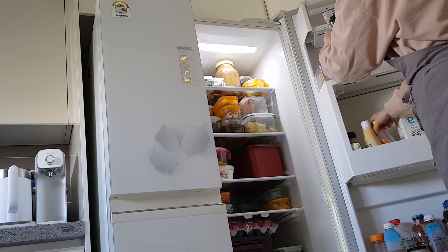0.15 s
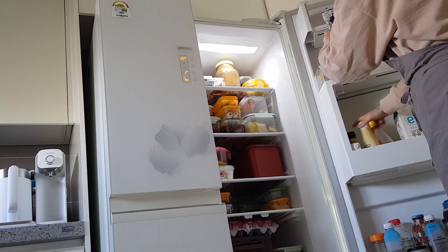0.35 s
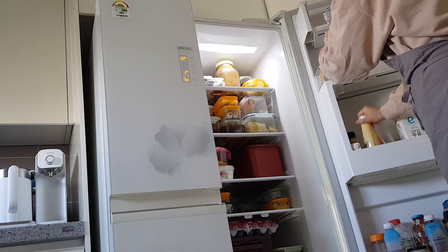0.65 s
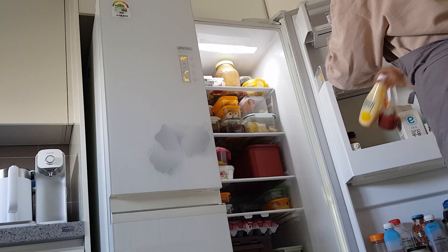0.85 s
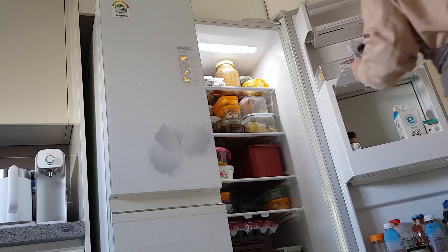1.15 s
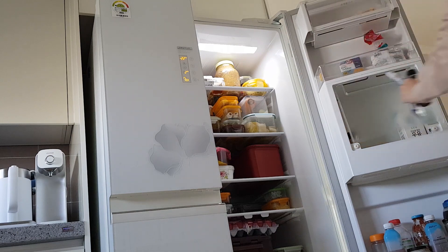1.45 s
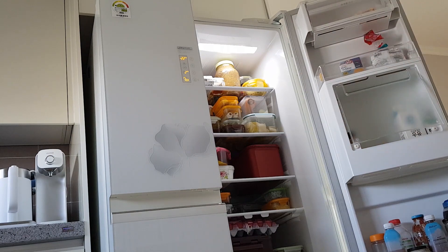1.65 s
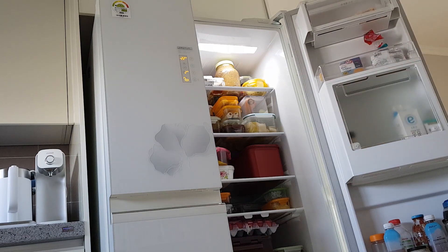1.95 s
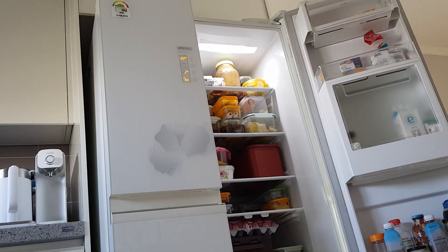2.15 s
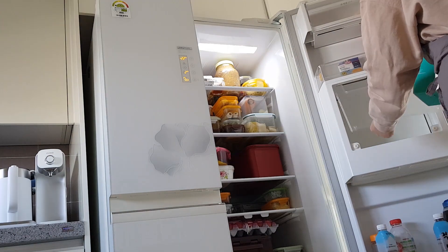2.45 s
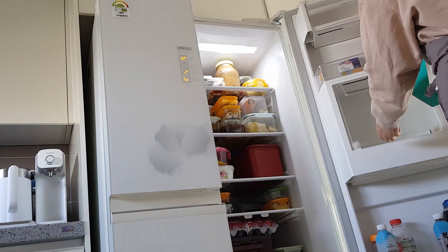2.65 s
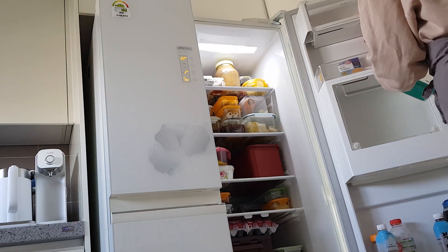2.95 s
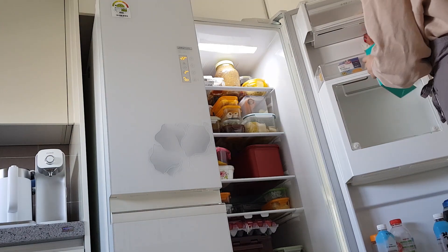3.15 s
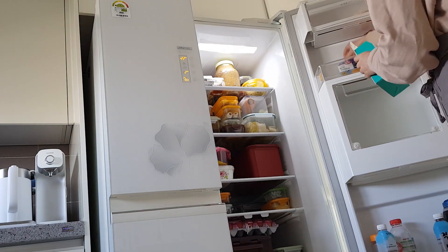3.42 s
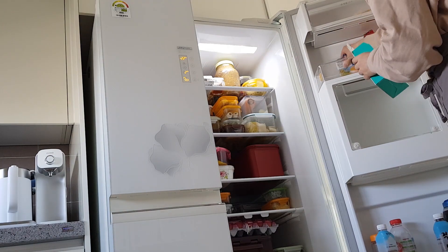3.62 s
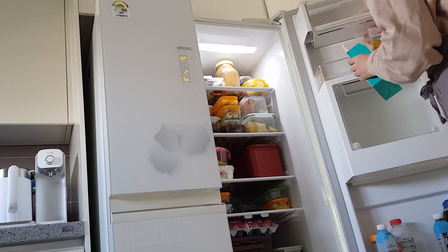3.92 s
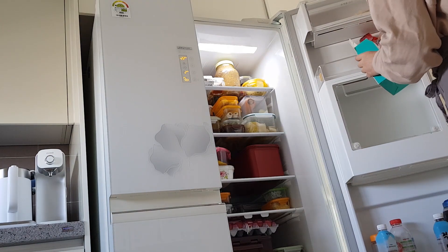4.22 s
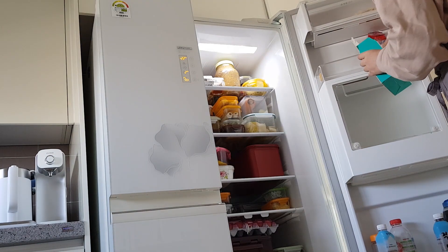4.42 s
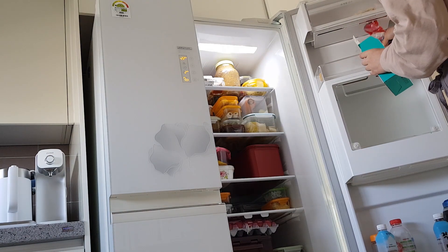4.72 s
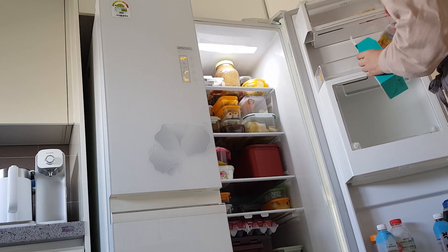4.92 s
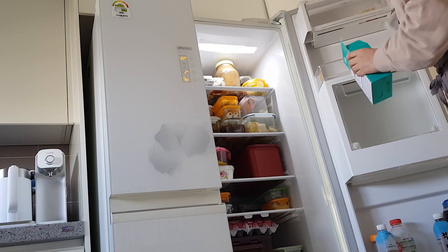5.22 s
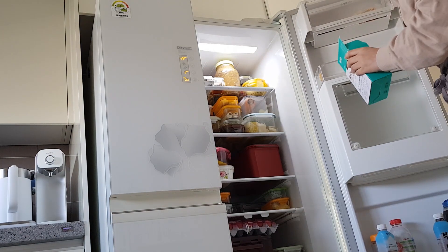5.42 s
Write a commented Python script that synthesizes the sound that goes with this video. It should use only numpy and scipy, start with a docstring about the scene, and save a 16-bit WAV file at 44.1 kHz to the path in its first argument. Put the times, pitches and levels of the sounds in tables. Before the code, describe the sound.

Bottles and jars knock and clink from a fridge door, an armful thuds onto a counter, a cover bangs shut, then plastic packets crackle.

```python
"""Bottles and jars knock and clink as the door shelves of a refrigerator are emptied in a hard-walled kitchen.
An armful lands on a counter, the bin's cover is pushed shut, then plastic packets are dragged off the top shelf.
Impacts are filtered clicks and decaying modes; film, scraping and cloth are trains of tiny random snaps.
Most sounds pass through a synthetic room; air noise and the compressor's hum lie underneath."""
import sys
import numpy as np
from scipy import signal
from scipy.fft import rfft, irfft
from scipy.io import wavfile

SR = 44100
rng = np.random.default_rng(int(sys.argv[2]) if len(sys.argv) > 2 else 0)


def log_audio(samples):
    """Write samples as a 16-bit WAV file to the path given in sys.argv[1]."""
    # one column per channel
    frames = np.atleast_2d(samples).T
    # limit to full scale, then quantise
    limited = np.clip(frames, -1, 1)
    pcm = np.round(limited * 32767).astype(np.int16)
    wavfile.write(sys.argv[1], SR, pcm)


N = 246078

HZ = np.fft.rfftfreq(8192, 1 / SR)  # frequency grid of the filter curves
PORTS_S = 0.00044  # travel time between the two microphone ports

# crackling spectrum of plastic film: (frequency [Hz], relative density [dB per Hz])
FILM_SPECTRUM = [(88, -34), (150, -26), (226, -2), (270, -36), (309, -13), (341, -14), (649, -2),
                 (837, -1.5), (1340, -0.5), (1980, -2), (11300, -4.5), (15100, -8), (16000, -15)]
# a packet is tugged along the top shelf:
# (start [s], rise [s], hold [s], relative crackle level [dB], scrape level [dB])
SHELF_PULLS = [(3.42, 0.093, 0.046, -36, -51), (3.607, 0.016, 0.0093, -35, -57),
               (3.76, 0.028, 0.092, -45, -61), (4.059, 0.027, 0.031, -37, -42),
               (4.152, 0.044, 0.099, -32, -43.5), (4.336, 0.09, 0.019, -30.5, -36.5),
               (4.48, 0.006, 0.17, -40.5, -61), (4.594, 0.021, 0.18, -31, -40.5),
               (4.744, 0.081, 0.095, -32.5, -33), (4.947, .01, 0.12, -38, -50),
               (5.044, .11, 0.066, -32, -58), (5.28, 0.021, 0.16, -34, -52.5),
               (5.537, 0.011, 0.027, -46, -48.5)]


def amp(db):
    """Decibels to amplitude gain: 20 dB is a factor of ten."""
    return 10 ** (np.asarray(db) / 20)


def evened(x):
    """Normalises the mean power, and so the rms, to one."""
    return x / np.sqrt(np.mean(x ** 2) + 1e-20)


def read(points, hz):
    """Interpolates (frequency [Hz], value) points along a logarithmic frequency axis."""
    f, value = np.transpose(points)
    return np.interp(np.log(hz + 1), np.log(f + 1), value)


def add(mix, s, sound):
    """Superposes a sound on the mix from time s, cut at the end of the mix."""
    part = mix[:, max(round(s * SR), 0):][:, :sound.shape[-1]]
    part += sound[..., :part.shape[1]]


def colour(x, db):
    """Minimum-phase filtering: the Hilbert transform of the log gain gives the causal phase."""
    log_gain = np.log(amp(np.maximum(db - db.max(), -100)))  # the peak of the curve becomes 0 dB
    circle = np.r_[log_gain, log_gain[-2:0:-1]]
    taps = np.fft.ifft(np.exp(signal.hilbert(circle).conj())).real
    return signal.fftconvolve(x, taps[:len(HZ) // 2])


def wander(per_s):
    """Linear interpolation between independent Gaussian knots of unit variance: a slow random curve."""
    knots = np.arange(0, N / SR + 1, 1 / per_s)
    return np.interp(np.arange(N) / SR, knots, rng.standard_normal(len(knots)))


def grains(per_s, spread_db):
    """Poisson-like shot noise: snaps of random sign and size, a few much larger than the rest."""
    size = amp(spread_db * np.minimum(rng.exponential(1, N), 4))
    happens = rng.random(N) < per_s / SR
    return evened(size * rng.choice([-1, 1], N) * happens)


def diffuse(count):
    """Diffuse-field coherence follows a sinc: the two ports agree in the bass, not in the treble."""
    a, b = rfft(rng.standard_normal((2, count)))
    same = np.sinc(2 * np.fft.rfftfreq(count, 1 / SR) * PORTS_S)
    return irfft(np.array([a, same * a + np.sqrt(1 - same ** 2) * b]), count)


def kitchen(x, build_s=0.00062, direct_db=-13, early_db=3, early_s=0.045):
    """Reverberation: a direct path, then diffuse reflections that build up and decay exponentially by band."""
    # reverberation time: (frequency [Hz], t60 [s])
    decay_times = [(60, 1), (200, 0.54), (500, 0.57), (1000, 0.5), (3000, 0.37), (8000, 0.34), (15000, 0.3)]
    hz, t, z = signal.stft(diffuse(count=24576), SR, nperseg=256)
    z = z * amp(-60 * t / read(decay_times, hz)[:, None])
    tail = signal.istft(z * amp(early_db * np.exp(-t / early_s)), SR)[1]
    tail = tail * np.sqrt(1 - np.exp(-np.arange(tail.shape[1]) / SR / build_s))
    response = tail / np.linalg.norm(tail[0])
    # the direct sound reaches the second port later
    response[[0, 1], [0, round(PORTS_S * SR)]] += amp(direct_db)
    return signal.oaconvolve(x[None], response / np.linalg.norm(response[0]), axes=1)


def sounded(x, db, contact_s, heard_s=0.021):
    """Energy scaling of a transient, its room swelling more slowly after a longer contact."""
    unit = x / np.linalg.norm(x) * np.sqrt(heard_s * SR)  # about unit rms over heard_s
    return amp(db) * kitchen(unit, contact_s)


def contact(spectrum_db):
    """Impulse excitation: one click takes on the spectrum of the struck thing."""
    return colour(np.ones(1), spectrum_db)


def ringing(modes, t, base_hz=1):
    """Modal superposition: sines at multiples of base_hz, each with its exponential decay."""
    return sum(amp(db - 60 * t / t60) * np.sin(2 * np.pi * base_hz * ratio * t) for ratio, db, t60 in modes)


def thumps(blows, thud, modes, thud_db, ring_db, pivot_hz=600, rise_s=0.0034):
    """Impact on a panel: a broad thud of varying spectral tilt, and the slow decay of the panel's modes."""
    out, t = np.zeros((2, N)), np.arange(SR * 3 // 2) / SR
    ring = ringing(modes, t) * (1 - np.exp(-t / rise_s))
    for s, db, tilt_db, contact_s in blows:
        spectrum = read(thud, HZ) + tilt_db * np.log2(1 + HZ / pivot_hz)
        add(out, s, sounded(contact(spectrum), db + thud_db, contact_s))
        add(out, s, amp(db + ring_db) * ring)  # the ring itself has no room
    return out


def stroke(rise_s, hold_s):
    """Friction force of one stroke as gain: the grip tightens, sags a little while held, and lets go."""
    slack_db, sag_db_per_s, release_db_per_s = 13, 8, 446
    t = np.arange(0, rise_s + hold_s + 0.2, 1 / SR)
    slack = slack_db * np.maximum(1 - t / rise_s, 0)
    sag = sag_db_per_s * np.maximum(t - rise_s, 0)
    release = release_db_per_s * np.maximum(t - rise_s - hold_s, 0)  # on top of the sag
    return amp(-slack - sag - release)


def effort(strokes):
    """Power addition of overlapping (start [s], rise [s], hold [s], level [dB]) strokes, as a gain."""
    power = np.zeros((1, N))
    for s, rise_s, hold_s, db in strokes:
        add(power, s, (amp(db) * stroke(rise_s, hold_s)) ** 2)
    return np.sqrt(power[0])


def film_effort():
    """Work on the film drives its crackle: gain of every squeeze and tug."""
    # a packet is squeezed in the hand: (start [s], rise [s], hold [s], relative crackle level [dB])
    squeezes = [(1.1, 0.0075, 0.029, -54.5), (1.305, 0.022, 0.024, -41.5), (2.08, 0.0042, .12, -60.5),
                (2.284, 0.0076, 0.034, -51), (2.43, 0.0036, 0.011, -62.5), (3.034, 0.0078, 0.024, -36.5)]
    return effort(squeezes + [pull[:4] for pull in SHELF_PULLS])


def arch(length_s):
    """Half-sine velocity of a swing: up from rest and back to rest."""
    return np.sin(np.pi * np.arange(0, length_s, 1 / SR) / length_s)


def background(air_db=-56, waver=0.066, drift=0.27):
    """Stationary broadband air noise, and compressor partials wavering in amplitude and phase [rad]."""
    # air noise: (frequency [Hz], relative density [dB per Hz])
    air_spectrum = [(15, -33), (25, -8), (70, 8), (120, 9.5), (166, -6.5), (236, 0), (285, -7.5), (363, -2),
                    (607, -6.5), (754, -7), (840, -13), (2160, -29), (7710, -28.5), (11900, -26.5),
                    (16000, -33)]
    # hum partials: (frequency [Hz], rms level before wavering [dB])
    hum_partials = [(59.2, -61), (119, -66), (226, -72), (376.8, -71), (500.6, -85), (576, -80.5)]
    t = np.arange(N) / SR
    air = irfft(rfft(diffuse(count=N)) * amp(read(air_spectrum, np.fft.rfftfreq(N, 1 / SR))), N)
    hum = np.zeros(N)
    for hz, db in hum_partials:
        swell = amp(db) * (1 + waver * wander(2.27))
        hum += swell * np.sin(2 * np.pi * hz * t + drift * wander(1.49))
    return amp(air_db) * evened(air) + np.sqrt(2) * hum


def sleeve(level_db=-1, per_s=5000, spread_db=3, speed_power=0.23):
    """Fibre friction: dense catches and releases whose level follows the speed of the arm."""
    # sleeves brush as the arm swings: (start [s], length [s], relative level [dB])
    reaches = [(0, 0.23, -63), (0.584, .26, -65.5), (.96, 0.4, -57.5), (1.266, 0.34, -53.5),
               (1.736, 0.34, -62.5), (2.3, 0.45, -73), (2.668, 0.57, -54), (3.396, 0.21, -42.5),
               (3.69, 1, -52.5)]
    # brushing cloth: (frequency [Hz], relative density [dB per Hz])
    cloth_spectrum = [(200, -38), (800, 7), (3000, 0.5), (9000, -2), (16000, -1)]
    swings = np.zeros((1, N))
    for s, length_s, db in reaches:
        add(swings, s, amp(db) * abs(arch(length_s)) ** speed_power)
    brushing = evened(colour(grains(per_s, spread_db), read(cloth_spectrum, HZ))[:N])
    return amp(level_db) * kitchen(brushing * swings[0])[:, :N]


def hinge(level_db=-54, octave_db=-16, uneven_db=7.0, speed_power=0.84):
    """Stick-slip groan of the cover's stiff hinge: a rising tone and its octave, uneven in level."""
    start_s, length_s, start_hz, rise_hz_per_s = 2.27, 0.45, 114.8, 33
    out, speed = np.zeros((2, N)), abs(arch(length_s))
    slip_hz = start_hz + rise_hz_per_s * np.arange(len(speed)) / SR
    phase = 2 * np.pi * np.cumsum(slip_hz) / SR
    swell = speed ** speed_power * amp(level_db + uneven_db * wander(22.7)[:len(speed)])
    groan = np.sin(phase) + amp(octave_db) * np.sin(2 * phase)
    add(out, start_s, np.sqrt(2) * swell * groan)
    return out


def hollow(level_db=-8, width_hz=130, grip_db=4):
    """Cavity resonance: uneven rubbing excites a narrow band at the pitch of the squeezed packet."""
    # a hollow packet rubs past the hand: (start [s], rise [s], hold [s], relative level [dB], cavity [Hz])
    rubs = [(3.698, 0.014, 0.024, -39.5, 742), (4.28, 0.046, 0.18, -36.5, 766),
            (4.615, 0.032, 0.11, -25.5, 753), (4.883, .035, 0.025, -26, 606),
            (4.966, 0.028, .025, -38, 633), (5.136, 0.026, 0.065, -34.5, 758)]
    out, narrow = np.zeros((1, N)), signal.butter(2, width_hz / 2, fs=SR, output="sos")
    for s, rise_s, hold_s, db, hz in rubs:
        gain = amp(db) * stroke(rise_s, hold_s)
        rub = signal.sosfilt(narrow, rng.standard_normal((2, SR)))[:, :len(gain)]
        # low-passed noise is shifted up to the cavity's pitch
        turn = np.exp(2j * np.pi * hz * np.arange(len(gain)) / SR)
        cavity = (turn * (rub[0] + 1j * rub[1])).real
        cavity = cavity * amp(grip_db * wander(20.5)[:len(gain)])
        add(out, s, gain * evened(cavity))
    return amp(level_db) * kitchen(out[0])[:, :N]


def drag(level_db=0, per_s=700, spread_db=3):
    """Stick-slip excitation of the plastic shelf's resonances by the dragged packets."""
    # shelf resonances: (frequency [Hz], width [Hz], relative level [dB])
    shelf = [(215, 57, -8.5), (309.5, 23, 4), (348, 15, 1.5), (404, 27, 2), (513, 49, -0.5), (650, 46, 3.5),
             (905, 28, 4), (1472, 79, 3.5)]
    power = sum(amp(db) ** 2 / (1 + ((HZ - hz) / width) ** 2) ** 2 for hz, width, db in shelf)
    slips = evened(colour(grains(per_s, spread_db), 10 * np.log10(power))[:N])
    pressure = effort([(s, rise_s, hold_s, scrape_db) for s, rise_s, hold_s, _, scrape_db in SHELF_PULLS])
    return amp(level_db) * kitchen(slips * pressure)[:, :N]


def crinkles(level_db=-6, per_s=60, spread_db=0.5, direct_db=-3):
    """Sparse buckling: single creases pop facing the microphone, with a strong direct path."""
    pops = evened(colour(grains(per_s, spread_db), read(FILM_SPECTRUM, HZ))[:N])
    return amp(level_db) * kitchen(film_effort() * pops, direct_db=direct_db)[:, :N]


def packets(level_db=1, per_s=620, spread_db=5.0, fold_db=4, clump_db=3.5, count=5):
    """Film buckling in clumps of tiny snaps; every fold has its own colour and room response."""
    grip = film_effort()
    pitches, out = np.geomspace(700, 16000, 22), 0
    for _ in range(count):
        fold = read(np.c_[pitches, rng.uniform(-1, 1, len(pitches))], HZ)
        buckles = grains(per_s / count, spread_db) * amp(clump_db * wander(30))
        crackle = evened(colour(buckles, read(FILM_SPECTRUM, HZ) + 2 * fold_db * fold)[:N])
        out = out + kitchen(grip * crackle)[:, :N]
    return amp(level_db) * out / np.sqrt(count)


def door_blows():
    """Panel vibration of the hollow door under blows, the loudest as the bin's cover is shut."""
    # (time [s], relative level [dB], treble tilt [dB per octave], contact time [s])
    blows = [(.33, -51, -8, 0.011), (1.22, -40, 6, 0.0045), (1.405, -42, 2.5, 0.0057),
             (2.275, -57, 4, 0.012), (2.712, -37, 2.5, 0.005), (2.722, -25.5, -8, 0.005),
             (2.734, -27, 5, 0.0034), (2.746, -19.5, 6.5, 0.00058), (2.755, -19.5, -2, .005),
             (2.975, -36.5, -2.5, 0.006), (3.11, -45, -22, 0.0088), (3.422, -38, -9.5, 0.0047)]
    # broad thud: (frequency [Hz], relative density [dB per Hz])
    thud = [(120, -28.5), (200, -9), (232, 2.5), (268, -22), (373, -3), (440, -11), (529, -8.5),
            (883, -17.5), (1040, -16), (1560, -24.5), (3690, -38), (9580, -63.5), (16000, -73)]
    # modes of the hollow door: (frequency [Hz], relative level [dB], t60 [s])
    modes = [(54.3, -9, 1.1), (80.3, -5, 1.44), (96.4, -13, 1.1), (183, -35, 0.64), (218, 0, 0.45),
             (252, -17.5, 1.22), (310, -2.5, 0.66), (358, -49, 0.22), (374, -12, 0.43), (414, -36, 0.5),
             (540, -6, 0.38), (520, -6, 0.81), (560, -30, 0.4), (670, -56, 0.75), (1000, -33, .4),
             (1130, -18, 0.7)]
    return thumps(blows, thud, modes, thud_db=-1.5, ring_db=-5.5)


def counter_landings():
    """Modal response of the loaded counter as the armful lands piece by piece, then one piece topples."""
    # (time [s], relative level [dB], treble tilt [dB per octave], contact time [s])
    landings = [(1.523, -22.5, 1, 0.012), (1.53, -27, 7, 0.0034), (1.543, -16.5, 2, 0.0019),
                (1.553, -19.5, 3.5, 0.0019), (1.559, -17.5, 0.5, 0.0012), (1.576, -27.5, -5, 0.013),
                (1.882, -37.5, -6.5, 0.0024), (1.892, -34.5, 0, 0.0018), (1.899, -28.5, -5.5, 0.0031)]
    # broad thud: (frequency [Hz], relative density [dB per Hz])
    thud = [(24, -32), (40, -18), (96, -8.5), (151, -23), (180, -8.5), (226, 1), (276, -5.5), (770, -6),
            (896, -8), (990, -10), (1150, -12.5), (1340, -10), (2980, -22), (11300, -38.5), (16000, -51)]
    # modes of the counter and its load: (frequency [Hz], relative level [dB], t60 [s])
    modes = [(58, -12, 0.96), (82, -15, 0.88), (94.1, -10, 0.83), (125.7, -13, 0.98), (195, -1.5, 0.25),
             (234.7, 3.5, 0.56), (249.5, -9, 0.98), (330.6, -12.5, 0.82), (336, -19, 0.59), (466, -6, 0.47),
             (509, -24, 0.94), (550, -4, 0.26), (610, -26, 0.57), (785, -33, .4), (750, -29, .35),
             (1012, -14.5, 0.52), (1100, -20, 0.25), (1300, -17, 0.44), (1443, -8.5, 0.27)]
    return thumps(landings, thud, modes, thud_db=-1.0, ring_db=-7.5)


def snaps(pivot_hz=300, contact_s=0.003):
    """Impulsive clicks of caps, wrappers and fingers on thin plastic, each with its own spectral tilt."""
    # (time [s], level [dB], treble tilt [dB per octave])
    clicks = [(0.152, -62, 5), (.21, -57.5, 9), (.338, -55.5, 7), (0.623, -58, -1), (0.713, -49.5, 3),
              (0.933, -52, 2), (.999, -44.5, -0.5), (1.109, -36, 6), (1.166, -45, 1), (1.308, -39, -0.5),
              (1.351, -36.5, 4), (1.995, -57, -2), (2.081, -57, 9), (2.28, -46, 10), (2.559, -41, -0.5),
              (2.9, -42.5, -4), (3.036, -38.5, 5), (3.096, -36, -4), (3.225, -35, 3), (3.367, -47.5, -1),
              (3.413, -40, -1), (3.453, -33, 3), (3.738, -36, 3.5), (3.98, -47, 2.5), (4.093, -38, 1.5),
              (4.439, -23.5, -0.1), (4.869, -28, 0.5), (4.927, -26, 5), (5.301, -28.5, 0)]
    # snapping plastic: (frequency [Hz], relative density [dB per Hz])
    snap_spectrum = [(200, -16.5), (800, 2), (1400, 4), (4200, 4.5), (10500, 0), (16000, -6.5)]
    out = np.zeros((2, N))
    for s, db, tilt_db in clicks:
        spectrum = read(snap_spectrum, HZ) + tilt_db * np.log2(1 + HZ / pivot_hz)
        add(out, s, sounded(contact(spectrum), db, contact_s))
    return out


def clinks(level_db=-1, contact_s=0.0015):
    """Damped modal ringing of full glass jars: the same mode ratios scaled to each jar's pitch."""
    # jars touch: (time [s], relative level [dB], reference pitch [Hz])
    touches = [(0.623, -58, 1950), (0.931, -65, 2880), (1.165, -48, 3900), (3.223, -38.5, 3924),
               (3.222, -42.5, 4520), (3.368, -48.5, 2020), (3.413, -37.5, 1510), (3.414, -39, 2440),
               (3.455, -36, 1530), (3.741, -51, 4500)]
    # modes of a jar: (ratio to the reference pitch, relative level [dB], t60 [s])
    jar_modes = [(0.998, 0.5, 0.069), (1.06, 1, 0.037), (1.13, 4, 0.013), (1.27, -13, 0.073),
                 (1.38, -23, 0.019), (1.49, -29, 0.034), (1.8, -16, 0.014)]
    out, t = np.zeros((2, N)), np.arange(SR // 4) / SR
    for s, db, hz in touches:
        add(out, s, sounded(ringing(jar_modes, t, hz), db + level_db, contact_s))
    return out


def knocks(contact_s=0.0012, steepness=8):
    """Contact stiffness limits bandwidth: a softer bump of bottle on bin has a lower corner."""
    # bottles bump the plastic bin: (time [s], level [dB], corner [Hz])
    bumps = [(0.314, -52.5, 400), (.388, -52.5, 1070), (.515, -48.5, 1200), (0.547, -46, 840),
             (.623, -48.5, 2000), (1.17, -47.5, 1790), (1.218, -39.5, 1630), (1.232, -41, 1250),
             (1.4, -42.5, 1510), (1.423, -63, 780), (2.42, -52, 620), (3.421, -47, 2200),
             (3.455, -38.5, 5000), (4.095, -35.5, 4000), (4.925, -29, 4500)]
    # struck bin: (frequency [Hz], relative density [dB per Hz])
    bin_spectrum = [(90, -31.5), (190, -4), (340, -4), (600, -5.5), (1100, -3), (3500, -5), (16000, -22)]
    out = np.zeros((2, N))
    for s, db, corner_hz in bumps:
        spectrum = read(bin_spectrum, HZ) - 10 * np.log10(1 + (HZ / corner_hz) ** steepness)
        add(out, s, sounded(contact(spectrum), db, contact_s))
    return out


def scene():
    """Linear superposition of all the handling over the air noise and hum."""
    rustle = sleeve() + hollow() + drag() + crinkles() + packets()
    blows = door_blows() + counter_landings()
    return background() + hinge() + rustle + blows + snaps() + clinks() + knocks()


def record(dry):
    """Linear filtering at the two ports: a level difference by frequency, a rumble cut and a band limit."""
    # (frequency [Hz], left minus right [dB])
    left_lead = [(60, 1.2), (180, 3.5), (350, 4), (700, 2.5), (1500, 3.5), (5500, 3), (11000, 3),
                 (15000, 1.5)]
    low_cut_hz, edge_hz = 38, 15950
    lead_db = read(left_lead, np.fft.rfftfreq(2 * N, 1 / SR))
    heard = irfft(rfft(dry, 2 * N) * amp(np.array([lead_db, -lead_db]) / 2))[:, :N]
    heard = signal.sosfilt(signal.butter(2, low_cut_hz, "highpass", fs=SR, output="sos"), heard)
    band_limit = signal.firwin(511, edge_hz, window=("kaiser", 9), fs=SR)
    return signal.oaconvolve(heard, band_limit[None], "same")


dry = scene()
out = record(dry)
log_audio(out)
```